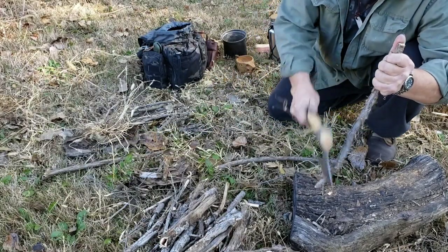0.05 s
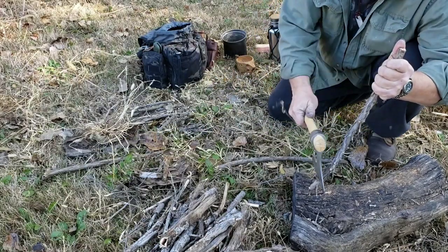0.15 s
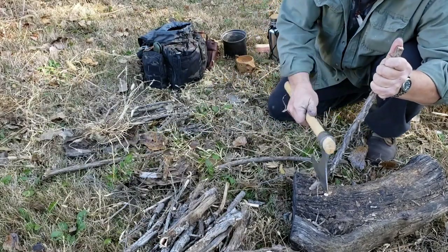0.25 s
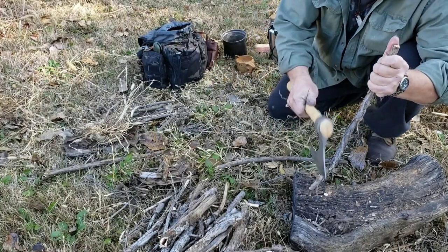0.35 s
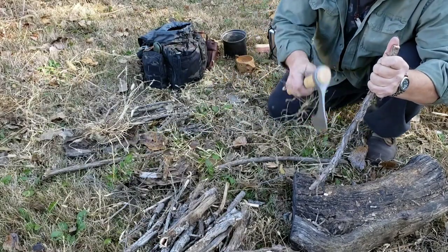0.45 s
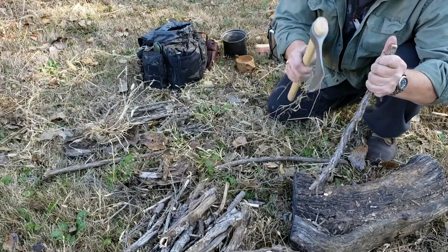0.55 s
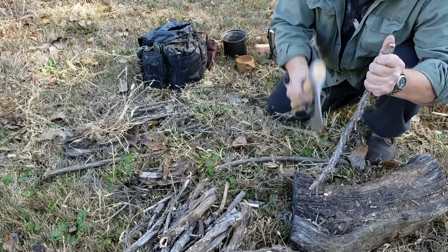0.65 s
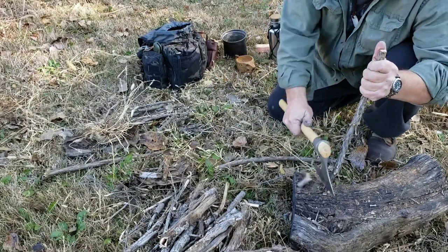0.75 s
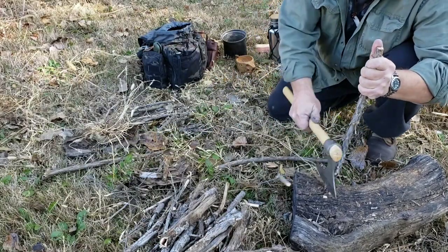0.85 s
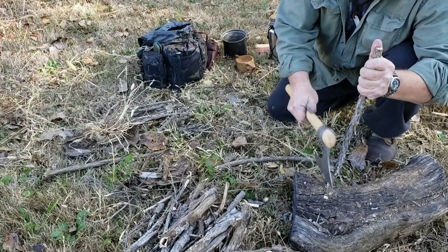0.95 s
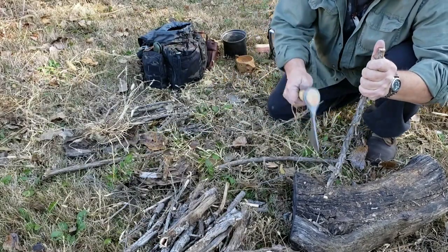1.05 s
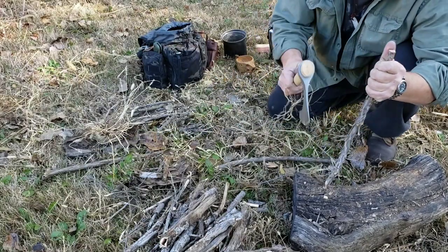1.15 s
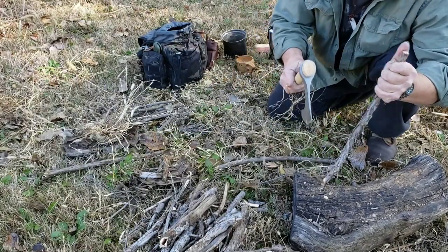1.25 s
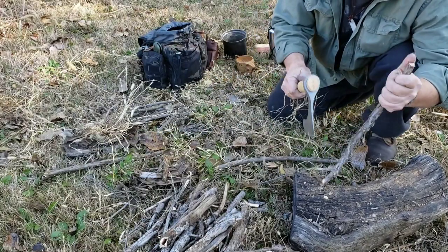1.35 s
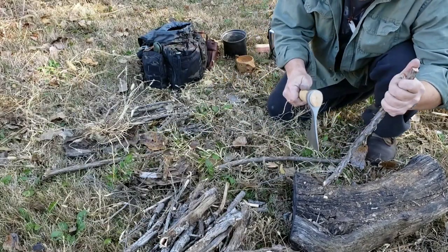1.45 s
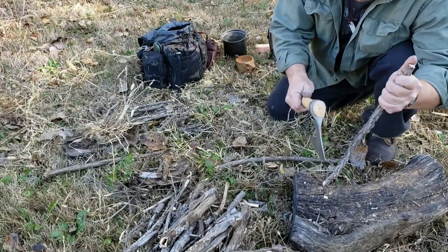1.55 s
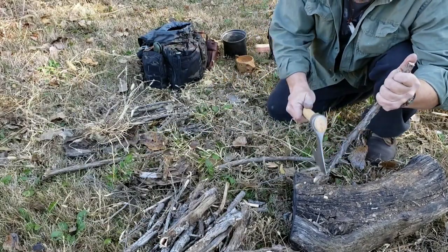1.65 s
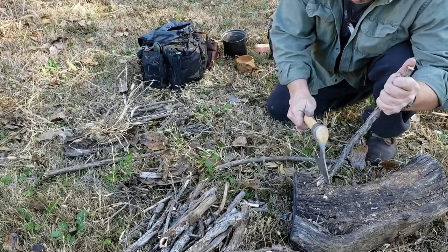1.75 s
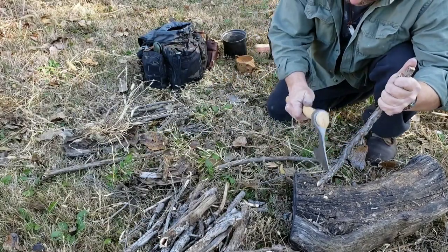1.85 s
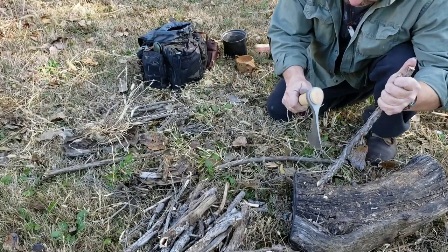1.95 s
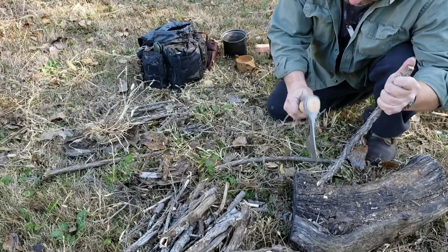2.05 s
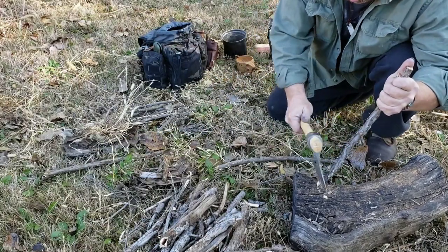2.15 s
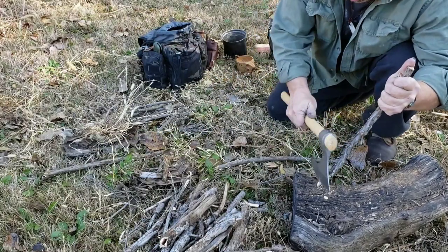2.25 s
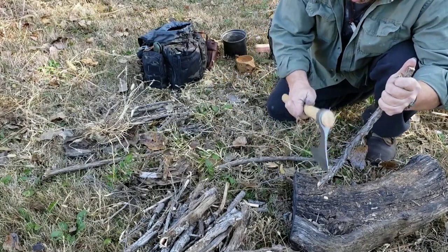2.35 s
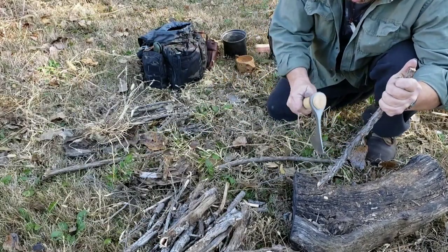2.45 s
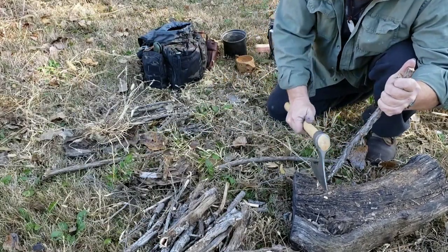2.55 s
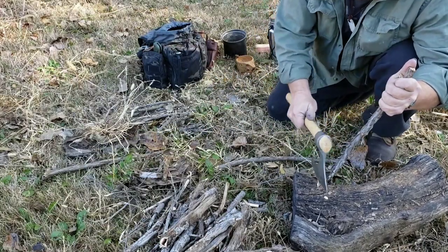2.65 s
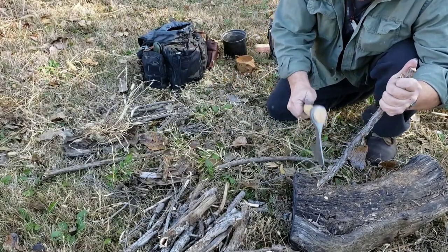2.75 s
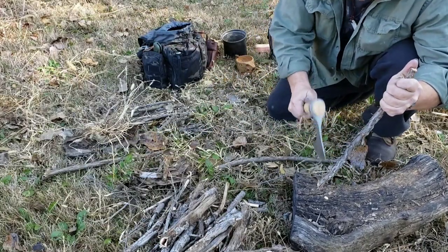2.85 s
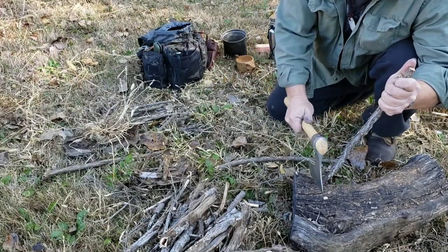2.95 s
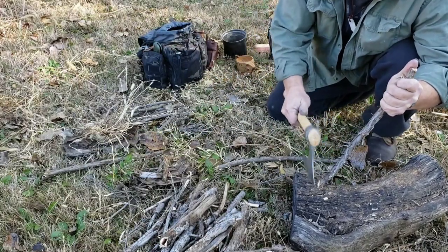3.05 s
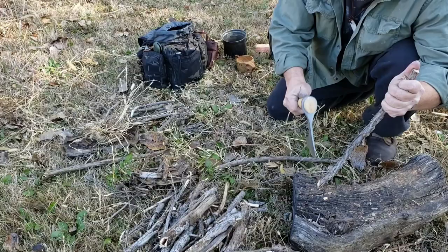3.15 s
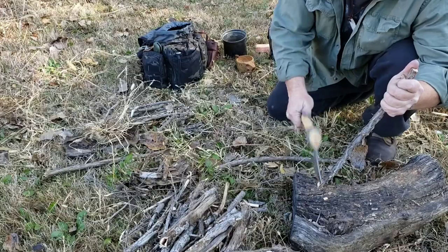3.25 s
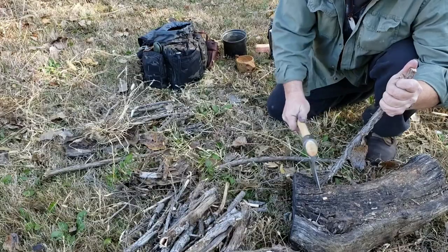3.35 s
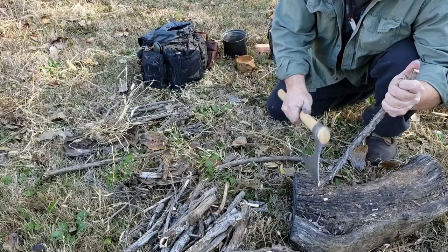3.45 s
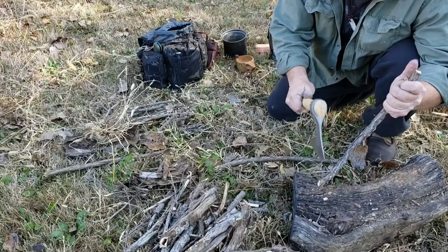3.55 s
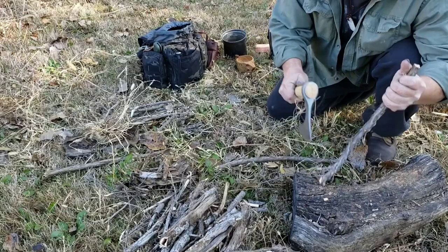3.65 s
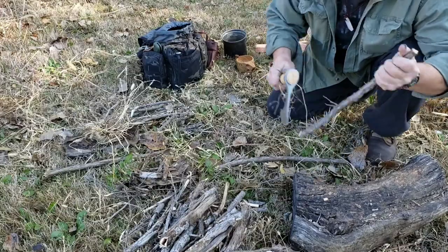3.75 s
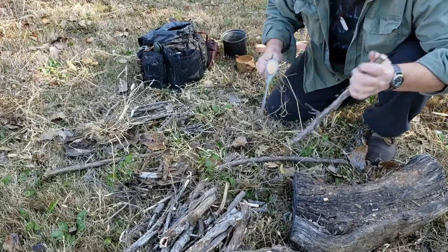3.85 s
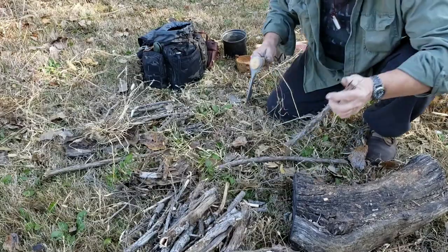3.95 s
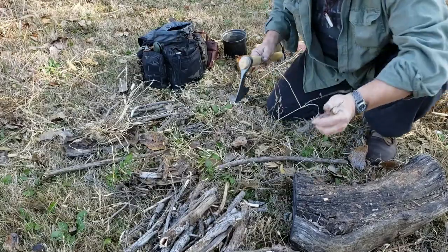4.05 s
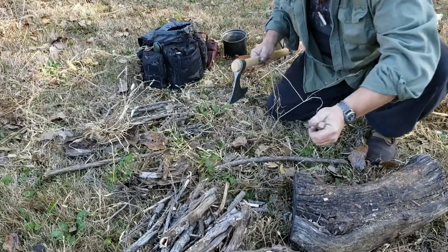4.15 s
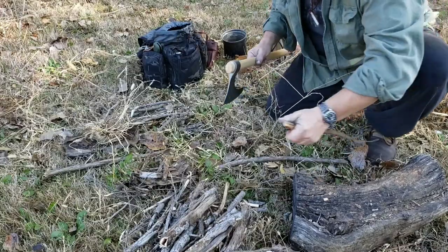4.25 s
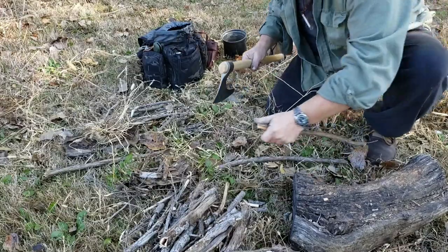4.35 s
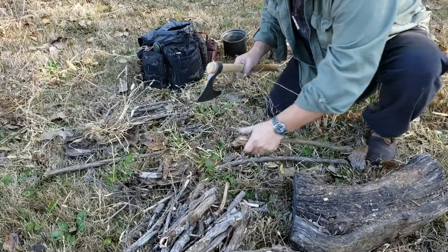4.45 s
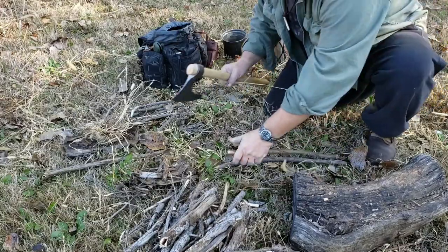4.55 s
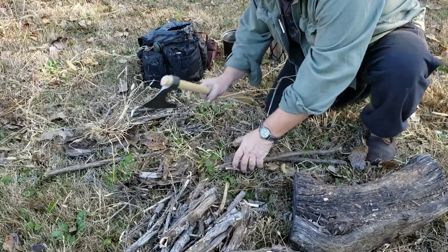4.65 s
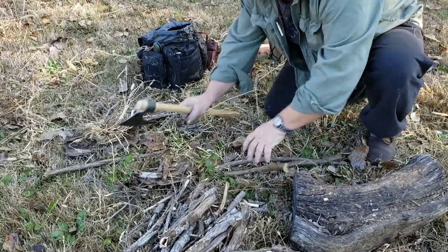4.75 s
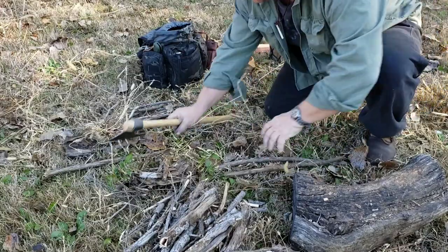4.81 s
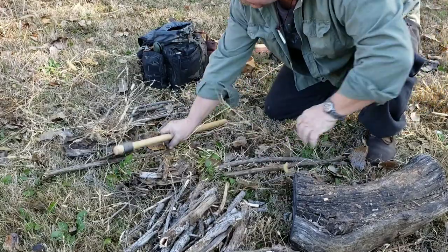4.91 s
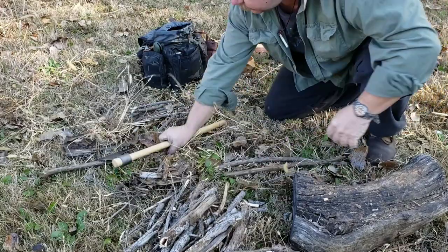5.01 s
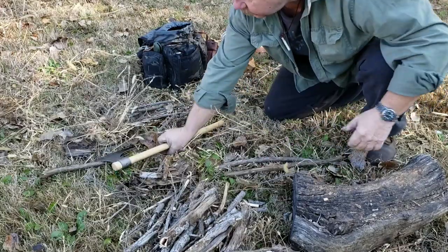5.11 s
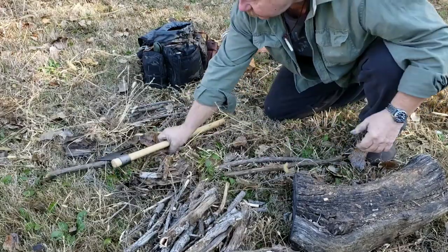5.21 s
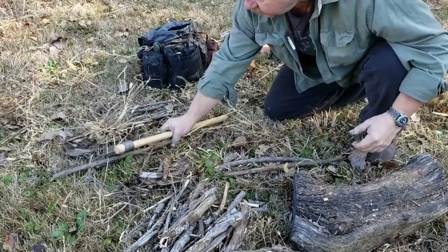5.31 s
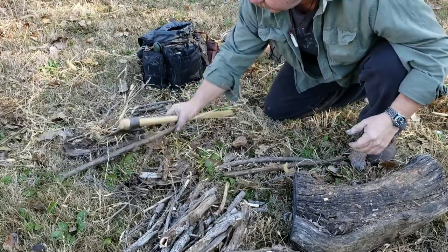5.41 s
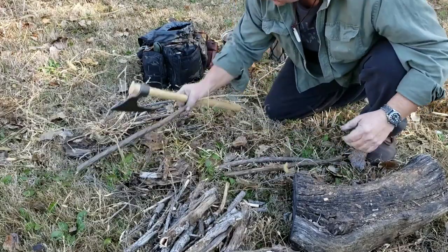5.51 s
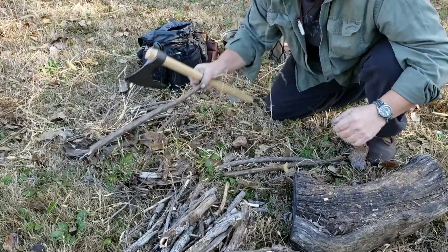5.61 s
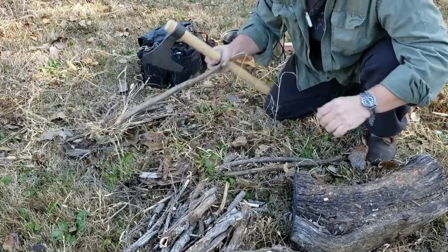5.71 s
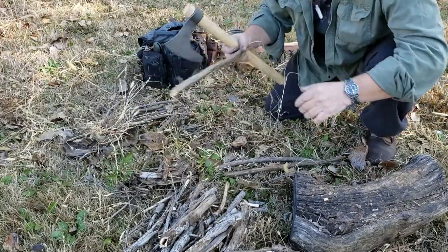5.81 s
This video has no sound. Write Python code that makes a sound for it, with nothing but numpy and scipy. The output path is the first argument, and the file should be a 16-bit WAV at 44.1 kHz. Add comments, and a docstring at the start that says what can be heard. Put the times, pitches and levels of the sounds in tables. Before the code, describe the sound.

Hatchet chops bite sharply into a wooden stake on a log outdoors, chips ticking down, then cloth and grass rustle over low wind rumble.

```python
"""Outdoors in a clearing: a hatchet sharpens a wooden stake on a log, six chops and one light set of the blade.
Each chop is filtered crackle (torn fibres), dying modes (stake, log, rocking ground) and falling chips.
Steel rings, parts clink, faint whistles swell; noise-built echoes come back from the ground and trees.
Later, shaped noise rumbles on the microphone and rustles as a jacket, and clicks crackle as dry grass."""
import sys
import numpy as np
from scipy import signal
from scipy.fft import rfft, irfft
from scipy.io import wavfile
from scipy.ndimage import uniform_filter1d

SR = 44100
rng = np.random.default_rng(int(sys.argv[2]) if len(sys.argv) > 2 else 0)


def wav_record(signal):
    """Record a signal, one row per channel, as 16-bit PCM in the file named by sys.argv[1]."""
    frames = np.transpose(np.atleast_2d(signal))
    bounded = np.clip(frames, -1, 1)
    # unit amplitude maps onto the largest positive 16-bit level
    quanta = np.round(bounded * 32767).astype(np.int16)
    wavfile.write(sys.argv[1], SR, quanta)


N = 259131

# edge grazes the bark, then bites: (bite time [s], bite level [dB], bite length [s], brightest at [Hz],
# graze lead [s], level of the peeling chip [dB])
CUTS = [(0.1643, -10, 0.0047, 3395, 0.0092, -23), (0.798, -16, .012, 3815, 0.0062, -19.5),
        (2.2113, -20, 0.0049, 2696, 0.0058, -35.5), (2.6287, -20, 0.0061, 3000, .012, -39),
        (2.9987, -28.5, 0.0078, 3000, .011, -42.5), (3.3709, -25, 0.0061, 3490, 0.013, -43.5)]
# blade comes to a stop: (time [s], stake level [dB], log level [dB], ground thud level [dB],
# contact hardness as lowpass corner [Hz], wood pitch factor [1])
BLOWS = [(0.1673, -15, -34, -40, 2965, 1.24), (0.17, -2, -34, -15.5, 4050, 0.96),
         (0.8023, -20.5, -44, -52.5, 5860, 0.82), (0.8271, -7.5, -19.5, -23.5, 298, 0.63),
         (2.213, -21.5, -39, -41, 2005, 0.64), (2.2206, -12.5, -31.5, -20, 1580, 0.94),
         (2.631, -5.5, -21, -19, 6060, 1.01), (3.0096, -20, -1, -19.5, 2800, 0.99),
         (3.3761, -10, 0, -22, 1302, 1.026)]
# stake modes before any pitch factor: (frequency [Hz], level [dB], t60 [s])
STAKE_MODES = [(246, -20.5, 0.052), (339, -14.5, 0.059), (460, -6.5, 0.021), (693.3, -21.5, 0.0093),
               (920, -5.5, 0.019), (1090, -15, 0.02), (1223, -8, .024), (1810, -25, .02),
               (2640, -16, 0.025), (3270, -21, 0.051)]
# worker's movement over the grass: (time [s], relative rustle level [dB])
RUSTLE = [(4.13, -67), (4.59, -80.5), (4.606, -52.5), (4.728, -68.5), (4.816, -55.5), (5.012, -57),
          (5.028, -51.5), (5.132, -52.5), (5.224, -63), (5.324, -52.5), (5.636, -59), (5.69, -62.5)]


def amp(db):
    """Decibels to gain."""
    return 10 ** (np.asarray(db) / 20)


def evened(x):
    """Scales to rms 1."""
    return x / np.sqrt(np.mean(abs(x) ** 2) + 1e-20)


def read(points, hz):
    """Reads a spectrum on a log-frequency axis."""
    f, value = np.transpose(points)
    return np.interp(np.log(hz + 1), np.log(f + 1), value)


def seconds(length_s):
    """A time axis."""
    return np.arange(int(length_s * SR)) / SR


def add(mix, at_s, sound):
    """Mixes a sound in at a given time."""
    part = mix[max(round(at_s * SR), 0):][:len(sound)]
    part += sound[:len(part)]


def follow(curve):
    """Gain along a level curve that fades in from silence over 50 ms."""
    s, db = np.transpose(curve)
    t = np.arange(N) / SR
    fade_in = np.clip((t - s[0]) * 20 + 1, 0, 1)
    return amp(np.interp(t, s, db)) * fade_in


def noise(spectrum):
    """Steady noise of a given colour, rms 1."""
    hz = np.fft.rfftfreq(N, 1 / SR)
    white = rfft(rng.standard_normal(N))
    return evened(irfft(white * amp(read(spectrum, hz)), N))


def ring(modes, t, pitch=1):
    """Dying modes of a struck body; neighbouring modes start in opposite directions."""
    out = np.zeros(len(t))
    for k, (hz, db, t60_s) in enumerate(modes):
        decay = amp(db - 60 * t / t60_s)
        out += (-1) ** k * decay * np.sin(2 * np.pi * hz * pitch * t)
    return out


def radiate(x, corner_hz):
    """A small body moves little air below its corner."""
    return signal.lfilter(*signal.butter(2, corner_hz, "high", fs=SR), x)


def crackle(t, spread_db):
    """Dense tiny fractures of very unequal size, rms 1."""
    sign, size = rng.standard_normal((2, len(t)))
    return evened(np.sign(sign) * amp(spread_db * np.clip(size, -2, 2)))


def fibre_click(centre_hz, focus_db, uneven_db=2.0, size=512):
    """One breaking fibre: a causal click of energy 1, brightest around its centre, with chance resonances."""
    # fibre spectrum before focusing: (frequency [Hz], relative level [dB per Hz])
    fibre_spectrum = [(100, -22), (300, -7.5), (650, -6.5), (1100, 9.5), (1500, 1.5), (2700, -0.5),
                      (4500, -2), (5300, -4.5), (7000, 0.5), (8700, -2), (9800, -6.5), (13000, -7),
                      (16000, -9.5)]
    hz = np.fft.rfftfreq(size, 1 / SR)
    octaves = np.log2((hz + 100) / centre_hz)
    resonances = uneven_db * evened(uniform_filter1d(rng.standard_normal(len(hz)), size=5))
    level_db = read(fibre_spectrum, hz) - focus_db * np.hypot(octaves, 1) + resonances
    # folding the cepstrum gives minimum phase
    cepstrum = irfft(np.log(amp(level_db)))
    cepstrum[1:size // 2] *= 2
    cepstrum[size // 2 + 1:] = 0
    click = irfft(np.exp(rfft(cepstrum)))
    return click / np.linalg.norm(click)


def snap(hz, dying_s, splinter=.4, focus_db=7, body_db=-27):
    """One sharp break and a dying spray of smaller ones, with a little of the wood's ring."""
    t = seconds(.11)
    spray = splinter * crackle(t, spread_db=8.5) * np.exp(-t / dying_s)
    spray[0] = 1
    thickness = (4000 / hz) ** 2  # thicker pieces sound darker and ring more
    piece = amp(body_db) * thickness * ring(STAKE_MODES, t)
    add(piece, 0, fibre_click(hz, focus_db))
    return signal.fftconvolve(spray, piece)


def air(level_db=-62.5):
    """Steady outdoor background: noise of fixed colour."""
    # (frequency [Hz], relative level [dB per Hz])
    air_spectrum = [(15, -38), (25, -1.5), (70, 2.5), (89, -4.5), (141, -15.5), (242, -18), (416, -21.5),
                    (796, -13), (1020, -21.5), (1520, -21), (4490, -27.5), (7400, -24), (10700, -36.5),
                    (15000, -43.5)]
    return amp(level_db) * noise(air_spectrum)


def cuts(release_s=0.0016, focus_db=7, entry=.13, graze_db=-23.5, peel_hz=4770, peel_s=0.012):
    """Each chop grazes the bark, tears fibres ever harder as the edge sinks in, and peels off a chip."""
    out = np.zeros(N)
    for s, bite_db, length_s, bite_hz, graze_s, peel_db in CUTS:
        t = seconds(.09) - graze_s
        after = np.maximum(t - length_s, 0)
        sinking = np.minimum(entry + t / length_s, 1)
        bite = np.where(t < 0, amp(graze_db), sinking) * np.exp(-after / release_s)
        peel = (t > length_s) * np.exp(-after / peel_s)
        for stroke, centre_hz in (amp(bite_db) * bite, bite_hz), (amp(peel_db) * peel, peel_hz):
            fractures = stroke * crackle(t, spread_db=6.5)
            add(out, s - graze_s, np.convolve(fractures, fibre_click(centre_hz, focus_db)))
    return out


def debris(tearing, level_db=-23, bits_per_s=700, spread_db=3, centre_hz=4200, linger_s=.018):
    """Crumbs of bark and wood fly from each cut and patter down, louder the harder it tore."""
    keep = np.exp(-1 / (linger_s * SR))
    flying = np.sqrt(signal.lfilter([1 - keep], [1, -keep], tearing ** 2))
    bits = evened((rng.random(N) < bits_per_s / SR) * crackle(tearing, spread_db))
    return amp(level_db) * signal.oaconvolve(flying * bits, fibre_click(centre_hz, focus_db=2.5))[:N]


def trees(t, t60_s=0.5, treble_loss=0.083, build_s=.014, uneven_db=4, taps_per_s=2000):
    """Sparse, unequal echoes from trunks and leaves; the treble dies first."""
    # echo colour: (frequency [Hz], level [dB])
    echo_levels = [(100, -25.5), (400, -29.5), (1200, -28), (3000, -21.5), (7000, -25), (14000, -23.5)]
    taps = crackle(t, uneven_db) * (rng.random(len(t)) < taps_per_s / SR)
    hz, at, z = signal.stft(taps * np.minimum(t / build_s, 1), SR, nperseg=256)
    fade = amp(-60 * at / t60_s * (1 + treble_loss * hz[:, None] / 10000))
    fade /= np.sqrt(np.mean(fade ** 2, axis=1, keepdims=True))
    fade *= amp(read(echo_levels, hz))[:, None]
    return signal.istft(z * fade, SR, nperseg=256)[1][:len(t)] / np.linalg.norm(taps)


def clearing(x, near_db=-21, near_t60_s=0.11, count=4, cycle_s=1.5):
    """Quick scatter from the ground, then the trees; the sound cycles smoothly through a few sets of paths."""
    t, out = seconds(0.89), np.zeros(N)
    phase = np.arange(N) / SR / cycle_s - np.arange(count)[:, None] / count
    share = np.cos(np.pi * phase) ** 8
    for part in share / np.linalg.norm(share, axis=0):
        near = rng.standard_normal(len(t)) * amp(-60 * t / near_t60_s) * (t > .004)
        near *= amp(near_db) / np.linalg.norm(near)
        out += signal.fftconvolve(x * part, near + trees(t))[:N]
    return out


def splits(hz=6500, dying_s=.0005):
    """Sharp cracks as splinters split off during a chop."""
    # (time [s], level [dB])
    cracks = [(0.1605, -4.5), (0.182, -15), (0.7998, 3.5), (0.8093, 7), (0.828, -12.5), (2.213, -6.5)]
    out = np.zeros(N)
    for s, db in cracks:
        add(out, s, amp(db) * snap(hz, dying_s))
    return out


def blows(chatter=0.0065, chatter_s=0.0013, sink_s=0.0088, sink_delay_s=0.0076,
          wood_hz=230, ground_hz=48, seating=0.01):
    """Stake and log knock briefly; the log then rocks on soft ground, seated a little differently each time."""
    # modes, log before the pitch factor, ground before seating: (frequency [Hz], level [dB], t60 [s])
    log_modes = [(244, -19.5, 0.0033), (327, -17.5, 0.0076), (440, -7, 0.017), (603, -13.5, 0.049),
                 (877, -1, 0.015), (985, -14, 0.03), (1176, -4.5, 0.027), (1350, -11, 0.03),
                 (1480, -10, 0.024), (2280, -20.5, 0.02), (2690, -18, 0.022)]
    ground_modes = [(89, 6.5, 0.059), (71.2, -10, 0.64), (78.5, -17.5, .85), (195, -37.5, 0.7)]
    out, t, rock_t = np.zeros(N), seconds(.12), seconds(0.69)
    for s, stake_db, log_db, thud_db, hard_hz, pitch in BLOWS:
        wood = amp(stake_db) * ring(STAKE_MODES, t, pitch) + amp(log_db) * ring(log_modes, t, pitch)
        # the blade judders as it stops
        force = chatter * rng.standard_normal(len(t)) * np.exp(-t / chatter_s)
        force[0] = 1
        contact = signal.butter(1, min(hard_hz, SR / 3), fs=SR)  # a soft contact weakens the high modes
        knock = signal.lfilter(*contact, signal.fftconvolve(force, wood))
        add(out, s, radiate(knock, wood_hz * pitch))
        rocking = sum(ring([mode], rock_t, 1 + seating * rng.standard_normal()) for mode in ground_modes)
        rocking *= 1 - np.exp(-(rock_t / sink_s) ** 2)
        add(out, s + sink_delay_s, amp(thud_db) * radiate(rocking, ground_hz))
    return out


def bark(crush_db=-21, crush_hz=2000, crush_s=.003, focus_db=7):
    """The blow crushes the log's bark, as hard as it knocks the log."""
    out, t = np.zeros(N), seconds(.04)
    for s, _, log_db, *_ in BLOWS:
        crumbs = crackle(t, spread_db=6.0) * np.exp(-t / crush_s)
        crush = np.convolve(crumbs, fibre_click(crush_hz, focus_db))
        add(out, s, amp(log_db + crush_db) * crush)
    return out


def metal(focus_db_per_octave=22):
    """The steel head rings, briefly when buried in wood; small parts clink as the hatchet is lifted."""
    # (time [s], level [dB], ringing time factor [1], strongest near [Hz])
    head_rings = [(0.1705, -34, 0.16, 4300), (0.454, -58, .6, 6600), (1.801, -59, 1, 4300),
                  (1.861, -56, 0.78, 7200), (2.2135, -42, 0.18, 4300), (2.632, -44, 0.18, 4300),
                  (2.79, -55, .6, 6600), (3.375, -33, .6, 11300)]
    # (time [s], level [dB])
    part_clinks = [(5.639, -49), (5.705, -47), (5.7131, -35)]
    # modes, steel before the ringing time factor: (frequency [Hz], level [dB], t60 [s])
    steel_modes = [(3295, -14, .15), (4280, -1.5, .25), (4344, 3.5, 0.38), (6500, -5.5, 0.31),
                   (8400, -0.5, 0.098), (9100, -1.5, 0.19), (13830, -3.5, .12)]
    clink_modes = [(6130, -8, 0.018), (7400, 2.5, 0.01), (7950, 2.5, 0.018), (8600, -8, 0.023),
                   (9870, -4, 0.013)]
    out, t = np.zeros(N), seconds(0.57)
    for s, db, freedom, near_hz in head_rings:
        modes = []
        for hz, mode_db, t60_s in steel_modes:
            off_octaves = abs(np.log2(hz / near_hz))
            modes.append((hz, mode_db - focus_db_per_octave * off_octaves, t60_s * freedom))
        add(out, s, amp(db) * ring(modes, t))
    for s, db in part_clinks:
        add(out, s, amp(db) * ring(clink_modes, t))
    return out


def chips(count=4, uneven_db=2.0, size_octaves=0.52, focus_db=13, flight_min_s=.06, flight_spread_s=.18,
          level_db=-40, fade_db_per_s=46.5, centre_hz=5500, dying_s=0.0018):
    """Small chips of chance size tick down after each chop, the later ones more softly."""
    out = np.zeros(N)
    for s, *_ in CUTS:
        flights_s = flight_min_s + flight_spread_s * (np.arange(count) + rng.random(count)) / count
        for flight_s, (force, size) in zip(flights_s, rng.standard_normal((count, 2))):
            db = level_db - fade_db_per_s * (flight_s - flight_min_s) + uneven_db * force
            hz = centre_hz * 2 ** (size_octaves * size)
            add(out, s + flight_s, amp(db) * snap(hz, dying_s, focus_db=focus_db))
    return out


def snaps(count=3, uneven=.15, focus_db=11, bounce_s=.015, bounce_shrink=0.94, bounce_loss_db=11.5):
    """Large chips land or twigs break, then bounce at shrinking, uneven intervals, ever more softly."""
    # (time [s], level [dB], brightest at [Hz], spray decay constant [s])
    pieces = [(0.457, -46, 3000, 0.019), (0.97, -33.5, 8000, .001), (1.029, -36, 7000, .008),
              (1.219, -38.5, 4000, 0.0088), (1.258, -39.5, 6850, 0.0019), (1.478, -44.5, 5010, .0045),
              (1.6688, -34.5, 7030, 0.0018), (1.691, -21, 5270, 0.0029), (1.7782, -43.5, 6000, .018),
              (1.86, -36, 4500, .006), (2.3014, -38, 6000, 0.0044), (2.5774, -40, 7050, .0011),
              (2.7748, -43.5, 5000, 0.022), (3.0875, -39, 2800, .0015), (3.453, -38, 5030, .0015),
              (3.749, -40, 5500, .005), (3.912, -41.5, 3500, 0.013), (4.0873, -37, 5000, 0.0034),
              (5.748, -34, 6160, 0.0028), (5.8525, -31.5, 5500, 0.0031)]
    out = np.zeros(N)
    for s, db, hz, dying_s in pieces:
        for k, luck in enumerate(rng.standard_normal(count)):
            add(out, s, amp(db - k * bounce_loss_db) * snap(hz, dying_s, focus_db=focus_db))
            s += bounce_s * bounce_shrink ** k * np.exp(uneven * luck)
    return out


def scrape(at_s=1.7765, length_s=0.098, level_db=-53.5, centre_hz=1250, focus_db=7, entry=0.097):
    """The blade, set lightly on the stake, slides along it under growing pressure."""
    out, t = np.zeros(N), seconds(length_s)
    pressure = np.minimum(entry + t / length_s, 1)
    slide = np.convolve(pressure * crackle(t, spread_db=4.5), fibre_click(centre_hz, focus_db))
    add(out, at_s, amp(level_db) * slide)
    return out


def whistles():
    """Thin, faint distant tones: sines that swell and fade."""
    # (time [s], rms level [dB], length [s], pitch [Hz])
    tones = [(1.877, -70, 0.25, 2434), (4.287, -77, 0.053, 2390)]
    out = np.zeros(N)
    for s, db, length_s, hz in tones:
        t = seconds(length_s)
        tone = np.hanning(len(t)) * np.sin(2 * np.pi * hz * t)
        add(out, s, amp(db) * evened(tone))
    return out


def wind():
    """Slow eddies push on the microphone, each as strong as the gust that carries it."""
    # buffeting colour: (frequency [Hz], relative level [dB per Hz])
    buffet_spectrum = [(8.8, -28), (15, -35), (37, 1), (61, -3), (79, -8), (123, -21.5), (300, -42.5),
                       (390, -46), (660, -120)]
    # (time [s], rms level [dB])
    gusts = [(3.68, -79), (3.73, -41), (4.02, -63), (4.09, -42), (4.13, -54.5), (4.24, -38), (4.27, -50),
             (4.41, -37.5), (4.46, -61), (4.62, -49), (4.66, -36), (4.74, -28.5), (4.82, -51),
             (4.98, -35.5), (5.01, -45.5), (5.18, -65), (5.28, -28.5), (5.32, -42.5), (5.36, -28),
             (5.48, -27.5), (5.52, -43.5), (5.68, -25), (5.71, -41), (5.73, -27), (5.81, -45), (5.88, -31)]
    eddies = signal.hilbert(noise(buffet_spectrum))
    # dividing by the running strength levels the noise's own swells
    strength = np.sqrt(uniform_filter1d(abs(eddies) ** 2, size=2400) + 0.046)
    return follow(gusts) * evened(eddies.real / strength)


def jacket(level_db=-0.5, patch_db=2.5, drift_db=2.5):
    """Sliding cloth: folds catch and slip in small patches, and the colour drifts as the sleeve moves."""
    # (frequency [Hz], relative level [dB per Hz])
    cloth_spectrum = [(120, -12), (200, -7.5), (305, -5.5), (671, -6.5), (1450, -7.5), (1770, -11.5),
                      (2560, -6.5), (3690, -11.5), (4680, -9), (7970, -14), (14900, -22.5), (16000, -32)]
    z = signal.stft(noise(cloth_spectrum), nperseg=256)[2]
    quick, slow = rng.standard_normal((2, *z.shape))
    # axis 0 is frequency, axis 1 time
    quick = evened(uniform_filter1d(uniform_filter1d(quick, size=6, axis=0), size=3, axis=1))
    slow = evened(uniform_filter1d(uniform_filter1d(slow, size=24, axis=0), size=30, axis=1))
    hiss = signal.istft(z * amp(patch_db * quick + drift_db * slow), nperseg=256)[1][:N]
    return amp(level_db) * follow(RUSTLE) * evened(hiss)


def grass(level_db=-6, stalks_per_s=300, spread_db=2.5, centre_hz=5200, count=8):
    """Dry stalks of many thicknesses crackle as the worker shifts his weight over them."""
    out = np.zeros(N)
    for hz in centre_hz * np.geomspace(.5, 2, count):
        stalks = (rng.random(N) < stalks_per_s / count / SR) * crackle(out, spread_db)
        out += signal.oaconvolve(stalks, fibre_click(hz, focus_db=5.5))[:N]
    return amp(level_db) * follow(RUSTLE) * evened(out)


def scene():
    """Everything reaches one microphone, so both channels are alike."""
    tearing = cuts() + bark()
    work = tearing + debris(tearing) + splits() + blows() + metal() + chips() + snaps() + scrape()
    mono = air() + work + clearing(work) + whistles() + wind() + jacket() + grass()
    return np.array([mono, mono])


def record(dry, edge_hz=16200):
    """Full-scale ceiling, then the band limit."""
    lowpass = signal.firwin(301, edge_hz, window=("kaiser", 9), fs=SR)
    return signal.oaconvolve(np.clip(dry, -1, 1), lowpass[None], "same")


dry = scene()
out = record(dry)
wav_record(out)
```